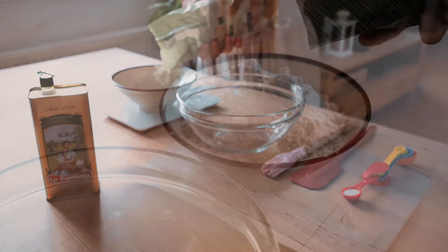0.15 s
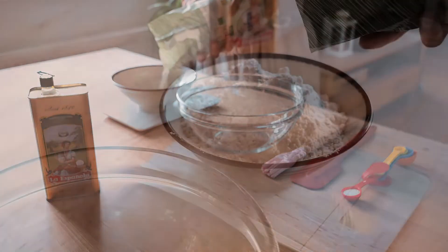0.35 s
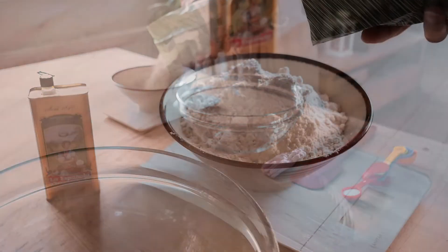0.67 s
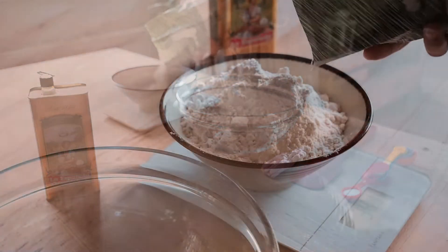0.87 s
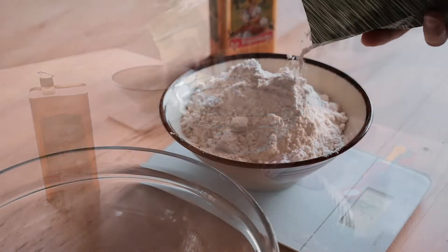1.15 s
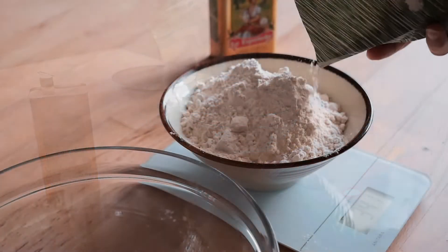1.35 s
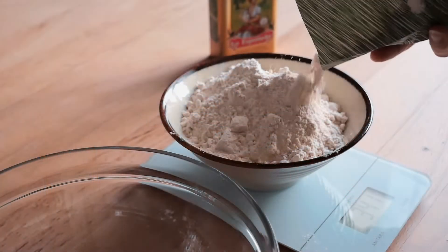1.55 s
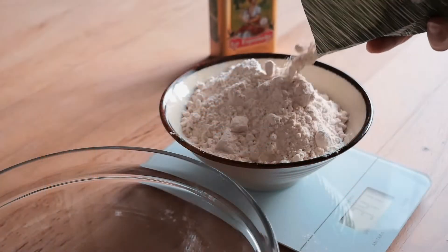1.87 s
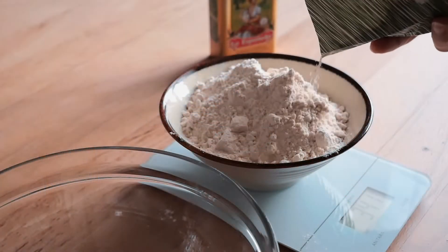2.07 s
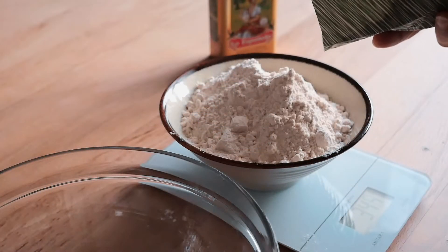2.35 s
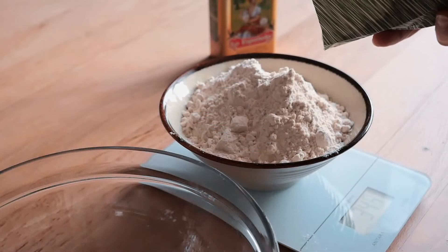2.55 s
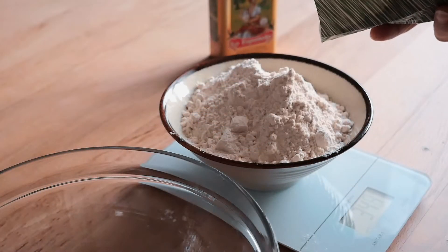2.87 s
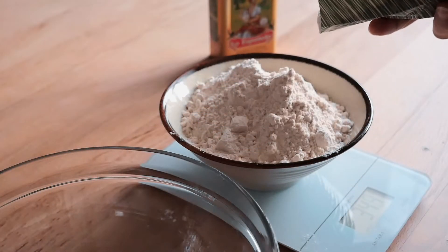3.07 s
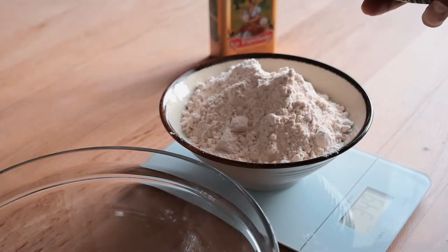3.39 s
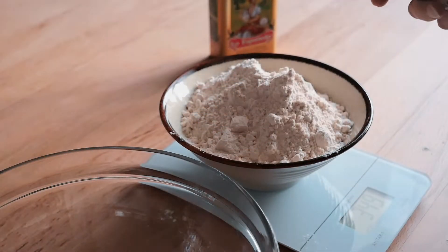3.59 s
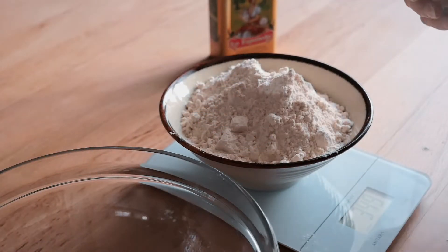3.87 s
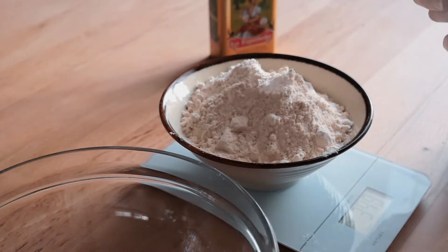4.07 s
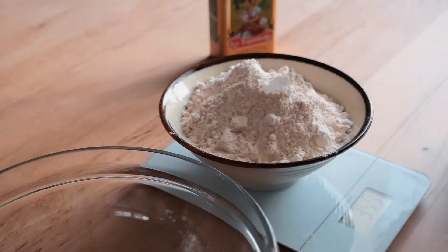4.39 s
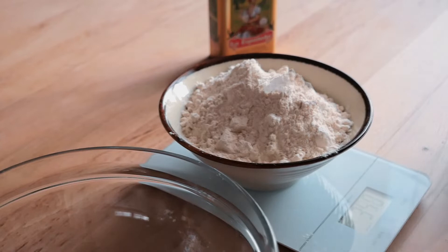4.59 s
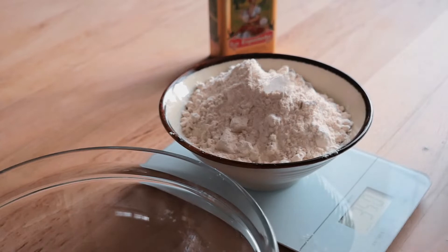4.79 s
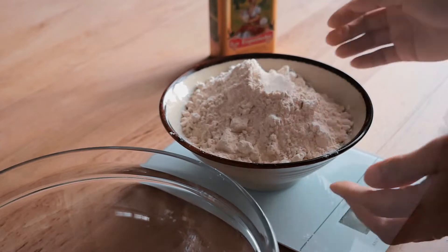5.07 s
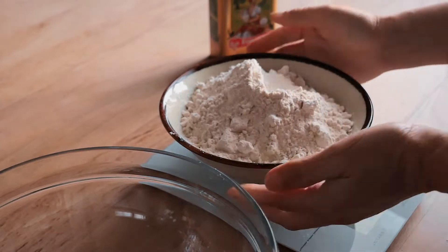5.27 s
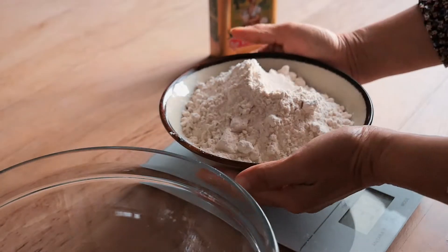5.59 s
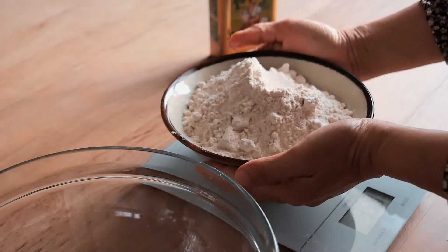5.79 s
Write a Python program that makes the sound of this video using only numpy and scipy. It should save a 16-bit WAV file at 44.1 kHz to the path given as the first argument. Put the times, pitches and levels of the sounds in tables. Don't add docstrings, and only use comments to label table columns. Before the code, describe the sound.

Close up in a lively kitchen, a hard double knock on wood opens, followed by soft, uneven paper rustles and a small click and rap as a flour bag is shaken. After a quiet pause with faint hum, the bag is lifted, glass sings for an instant, and the paper is crushed in loud crackling snaps. Faint settling rustles and a low bump end it.

```python
import sys
import numpy as np
from scipy import signal
from scipy.io import wavfile
from scipy.ndimage import uniform_filter1d

SR = 44100
rng = np.random.default_rng(int(sys.argv[2]) if len(sys.argv) > 2 else 0)


def materialize(psi):
    bounded = np.clip(np.atleast_2d(psi).T, -1, 1)
    quanta = np.round(bounded * 32767).astype(np.int16)
    wavfile.write(sys.argv[1], SR, quanta)


def gain_from_decibels(decibels):
    exponent = np.asarray(decibels, float) / 20
    return 10 ** exponent


N = 261954


def evened(x):
    return x / np.sqrt(np.mean(x ** 2) + 1e-20)


def peaked(x, db):
    return gain_from_decibels(db) * x / abs(x).max()


def add(mix, s, sound):
    part = mix[round(s * SR):][:len(sound)]
    part += sound[:len(part)]


def coloured(x, spectrum):
    f, db = np.transpose(spectrum)
    hz = abs(np.fft.fftfreq(8192, 1 / SR))
    gain_db = np.interp(np.log(hz + 1), np.log(f + 1), db, right=-90)
    log_gain = np.log(gain_from_decibels(gain_db))
    taps = np.fft.ifft(np.exp(np.conj(signal.hilbert(log_gain)))).real[:4096]
    return signal.oaconvolve(x, taps)[:len(x)]


def resonate(x, hz, width):
    b, a = signal.iirpeak(min(hz, 0.45 * SR), hz / max(width, 1), SR)
    return signal.lfilter(b, a, x)


# (frequency [Hz], t60 [s])
ROOM_DECAY = [(150, 0.29), (400, 0.32), (1040, 0.48), (2760, 0.42), (7280, 0.39)]
# (delay [s], level [dB])
EARLY_ECHOES = [(.0035, -15), (.0072, -10), (.0095, -14.5), (0.0136, -9.5), (0.019, -19.5)]


def room(x, tail_db):
    taps = np.zeros(SR)
    at = np.arange(200, SR - 20, 20)
    taps[at + rng.integers(0, 20, len(at))] = rng.choice([-1., 1.], len(at))
    hz, t, z = signal.stft(taps, SR, nperseg=256)
    t60 = np.interp(hz, *np.transpose(ROOM_DECAY))[:, None]
    tail = signal.istft(z * gain_from_decibels(-60 * t / t60), SR, nperseg=256)[1]
    tail /= np.linalg.norm(tail)
    for s, db in EARLY_ECHOES:
        tail[round(s * SR)] += gain_from_decibels(db)
    return x + gain_from_decibels(tail_db) * signal.fftconvolve(x, tail)[:N]


def crackle(per_s, spread_db, clump_db):
    size = gain_from_decibels(spread_db * np.minimum(rng.exponential(1, N), 5)) * rng.choice([-1., 1.], N)
    slow = uniform_filter1d(uniform_filter1d(rng.standard_normal(N), 300), 300)
    slips = rng.random(N) < per_s / SR
    return size * slips * gain_from_decibels(clump_db * evened(slow))


def strokes(rows, rise, fall):
    s, hold, db, bright_db, weight_db = np.transpose(rows)[:, :, None]
    t = np.arange(0, N + 64, 64) / SR
    shape_db = db - rise * np.maximum(s - t, 0) - fall * np.maximum(t - s - abs(hold), 0)
    shares_db = 0, 0.16 + 0.37 * bright_db, weight_db, bright_db
    powers = [(gain_from_decibels(shape_db + share) ** 2).sum(0) for share in shares_db]
    return np.array([np.repeat(power, 64)[:N] for power in powers])


# (time [s], hold [s], effort [dB], brightness [dB], weight on the table [dB])
SHAKES = [(0, .02, -67, -23, -12), (.03, .004, -49.5, -8, 4), (.25, 0.03, -51.5, -19, 0),
          (.375, 0.027, -58.5, -7.5, -1.5), (.5, 0.026, -56, -11, -4), (.56, 0.0033, -54.5, -12, -17),
          (.65, 0.0046, -63.5, -8, -1), (.68, .04, -58.5, -5, -0.5), (.802, 0.023, -55.5, -8.5, -4),
          (.86, 0.037, -58, -11, -6), (.978, 0.021, -58, -4.5, -18), (1.04, 0.088, -55, -8, -16.5),
          (1.3, .02, -64, -7, -11), (1.33, 0.0051, -50.5, -10, -9), (1.47, .03, -54, -5, -4),
          (1.584, 0.021, -50, -7.5, -13.5), (1.684, 0.0022, -46.5, -6, -26), (1.774, 0.027, -52.5, -5, -19),
          (1.86, .004, -59.5, -15, -19), (1.952, 0.0047, -63, -7, -15)]
LIFT = [(3.4, 0.012, -66, -9, -3), (3.478, 0.035, -50, -18, -12), (3.53, 0.051, -47.5, 0.5, -12),
        (3.6, .07, -47, 0.5, -14), (3.675, .004, -48.5, -4, -24)]
CRUSH = [(3.689, 0.076, -43.5, -9.5, -1), (3.75, 0.034, -39.5, -14, -8), (3.8, 0.014, -32, -19, -1.5),
         (3.835, 0.0043, -34.5, -14, 0.5), (3.848, 0.014, -28, -18.5, -0.3), (3.882, .015, -30.5, -13, -1),
         (3.937, 0.018, -30, -17, -2), (3.998, 0.046, -34.5, -4, -2.5), (4.05, 0.024, -35, -4.5, -12),
         (4.104, 0.011, -28, -5.5, -1.4), (4.15, 0.05, -38.5, -15, -11), (4.238, 0.013, -43, -13, -3),
         (4.29, .02, -52.5, -9, -9), (4.33, 0.0097, -43.5, -17, -11), (4.375, 0.015, -52, -10, 4),
         (4.41, .035, -59, -5, 3)]
SETTLE = [(4.5, 0.0091, -64.5, -26, 1.5), (4.63, .004, -62.5, -5.5, -21), (4.73, .003, -50, -14.5, -0.5),
          (4.772, .004, -54.5, -31, -8), (4.815, 0.0061, -63, -5.5, 2), (4.86, 0.046, -60.5, -9, 3),
          (4.95, .01, -63.5, -14, 7), (4.995, 0.079, -55, -10.5, -3.5), (5.2, 0.13, -71, -4.5, 2.5),
          (5.3, 0.017, -72.5, -9, 14.5), (5.372, .015, -53, -5, 10), (5.4, 0.02, -63.5, -6.5, 9),
          (5.55, 0.0036, -70, -6, -3)]
# (frequency [Hz], level [dB per Hz])
WALLS = [(380, -37.5), (650, -6), (765, -5.5), (844, -4), (1220, -2), (1420, -4.5), (2200, -12.5),
         (2600, -16.5), (3380, -38), (5720, -120)]
# (frequency [Hz], level [dB per Hz])
CREASES = [(1000, -26.5), (1700, -7), (2050, -11), (2380, -7), (2640, -4), (3310, -2.5), (3570, -3),
           (5140, -8.5), (6320, -3), (8070, -9), (13500, -13), (15100, -10.5), (16000, -34)]
# (frequency [Hz], level [dB per Hz])
THRUM = [(24, -58), (40, -24.5), (209, -7.5), (279, -9.5), (312, -8), (350, -2), (497, -4), (600, -6),
         (800, -9), (1040, -35.5), (1760, -120)]


def rustle():
    power = strokes(SHAKES, rise=210, fall=170) + strokes(LIFT, rise=150, fall=380)
    power = power + strokes(CRUSH, rise=650, fall=299) + strokes(SETTLE, rise=790, fall=225)
    walls = coloured(room(crackle(900, 2.5, 1.0), 0.), WALLS)
    creases = coloured(room(crackle(4000, 4.1, 4.04), -0.39), CREASES)
    low_pass = signal.butter(2, 8000, fs=SR, output="sos")
    hiss = signal.sosfiltfilt(low_pass, creases)
    fizz = creases - hiss
    thrum = coloured(room(crackle(700, 3.0, 0.91), 0.), THRUM)
    out = np.zeros(N)
    for layer, p in zip((walls, hiss, thrum, fizz), power):
        out += evened(layer) * np.sqrt(abs(uniform_filter1d(p, size=64)))
    return out


# (frequency [Hz], level [dB per Hz])
AIR_COLOUR = [(15, -36.5), (25, -12.5), (120, -10), (166, -15), (195, -8.5), (242, -13), (301, -13),
              (796, -15), (887, -14.5), (1020, -15.5), (2610, -26.5), (6210, -24.5), (12200, -29.5),
              (14800, -22.5), (16000, -40)]
# (frequency [Hz], width [Hz], level [dB])
HUM = [(240, 4.2, -74.5), (14680, 65, -93)]


def floor():
    t = np.arange(N) / SR
    air_db, hum_ends_s, hum_fade_s = -64.5, 3.65, 0.173
    air = gain_from_decibels(air_db) * evened(coloured(rng.standard_normal(N), AIR_COLOUR))
    hum = np.zeros(N)
    for hz, width, db in HUM:
        waver = 0.65 * evened(resonate(rng.standard_normal(N), hz, width))
        hum += gain_from_decibels(db) * (np.sin(2 * np.pi * hz * t) + waver)
    return air + hum * np.clip((hum_ends_s - t) / hum_fade_s, 0, 1)


# blows (time [s], peak [dB]), the object's
# colour (frequency [Hz], level [dB per Hz]), then the room level [dB]
THUD = ([(.0362, -9.5), (.0535, -20.5)], [(40, -56.5), (150, -22), (320, -8), (420, -6), (520, -5),
        (800, -16), (2000, -50.5), (16000, -91)], 0.45)
CLATTER = ([(.0372, -16), (.0392, -6), (.042, -10.5), (.045, -10.5), (.0467, -14), (.0548, -21)],
           [(53, -35), (90, -35.5), (457, -11.5), (915, -0.5), (1040, -10.5), (1270, 1), (1380, -16),
           (1910, -8.5), (2230, -17.5), (3430, -8), (4750, -19), (6300, -17.5), (13500, -37), (15000, -46),
           (16000, -53)], 1.4)
TICK = ([(3.7565, -17)], [(400, -28), (1000, -6), (2500, -1.5), (3200, -8.5), (6000, -35), (14000, -45.5)],
        -3.5)
CLICK = ([(.482, -19)], [(410, -42), (700, -14), (2060, 4), (3950, 7), (5270, 2.5), (6820, -22),
         (9000, -42), (11700, -64), (19800, -120)], -5.5)
RAP = ([(1.3405, -11.5), (1.345, -20), (1.352, -21.5), (1.3805, -16), (1.395, -29)], [(76, -59), (130, -59),
       (247, -12.5), (283, -20.5), (405, -13.5), (454, -18.5), (499, -11), (662, -12.5), (756, -9.5),
       (914, -3.5), (1260, -14), (1580, -14.5), (3070, -27.5), (6670, -45.5), (12000, -55), (15600, -90),
       (22000, -120)], 0.98)
BUMP = ([(5.3702, -30.5), (5.3743, -31), (5.383, -51), (5.41, -54)], [(59, -58), (100, -27), (218, -1),
        (318, 7), (374, -12), (553, 4), (624, 4.5), (744, -5.5), (1080, -18), (1260, -35), (2500, -25.5),
        (3250, -62), (5500, -120)], 0.33)
KNOCKS = THUD, CLATTER, TICK, CLICK, RAP, BUMP


def knock(blows, colour, tail_db):
    out, t = np.zeros(N), np.arange(2000) / SR
    rattle_gain = 0.14 * gain_from_decibels(min(tail_db, 0))
    for s, db in blows:
        rattle = rattle_gain * rng.standard_normal(2000) * np.exp(-t / 0.0021)
        push = (t == 0) + rattle
        add(out, s, peaked(coloured(push, colour), db))
    return room(out, tail_db)


# (frequency [Hz], width [Hz], level [dB])
GLASS = [(4730, 30, 3), (5950, 40, -8), (7230, 25, 2), (7480, 25, 2), (7900, 30, -5), (8970, 30, -8),
         (10460, 25, -3), (12150, 25, -2), (13300, 30, -11)]
# (frequency [Hz], width [Hz], level [dB])
DISH = [(487, 23, -7), (1068, 21, -2.5), (1200, 24, -0.5)]


def drag():
    t = np.arange(N) / SR
    s = np.cumsum([3.675, 0.022, 0.115, 0.04])  # start, then grip, slide and release [s]
    edge_db = -34.5 * np.array([1, 0, 0, 1])
    glass_db = -47 + edge_db
    dish_db = -42 + edge_db + 9.5 * np.array([0, 0, 1, 1])
    rub = crackle(3000, 2., 1.)
    glass, dish = np.zeros(N), np.zeros(N)
    for hz, width, db in GLASS:
        waver = 0.3 * evened(resonate(rng.standard_normal(N), hz, width))
        glass += gain_from_decibels(db) * (np.sin(2 * np.pi * hz * t) + waver)
    for hz, width, db in DISH:
        dish += gain_from_decibels(db) * evened(resonate(rub, hz, width))
    glass = evened(glass) * gain_from_decibels(np.interp(t, s, glass_db))
    dish = evened(dish) * gain_from_decibels(np.interp(t, s, dish_db))
    touching = (t > s[0]) & (t < s[-1])
    return touching * (glass + dish)


# (time [s], wall ring [Hz], ring peak [dB], crack centre [Hz], crack peak [dB])
SNAPS = [(3.688, 477, -25.5, 7470, -40), (3.792, 1180, -33.5, 4710, -50), (3.815, 2010, -13, 3260, -7.5),
         (3.846, 2283, -17, 6820, -19), (3.845, 1090, -9.5, 6370, -8), (3.849, 1088, -11, 4010, -12),
         (3.854, 1276, -11, 4980, -28.5), (3.86, 1330, -14.5, 6300, -21.5), (3.878, 859, -12, 6300, -13.5),
         (3.88, 1670, -12.5, 5400, -10), (3.886, 1352, -34.5, 4650, -36.5),
         (3.936, 915, -31.5, 3140, -52.5), (3.993, 2800, -15, 9800, -8.5), (3.997, 2326, -14, 6400, -12),
         (4.005, 1710, -16, 6490, -36.5), (4.045, 2020, -18, 3350, -31), (4.106, 1830, -18, 3400, -17),
         (4.118, 710, -14, 3990, -22), (4.127, 1110, -35.5, 4270, -39.5), (4.325, 953, -35, 6200, -28.5),
         (4.683, 1200, -45, 3890, -62.5), (4.724, 1140, -41, 3960, -29), (4.734, 1370, -39, 3690, -37.5),
         (5.034, 660, -52.5, 6400, -57)]


def snaps():
    out, t = np.zeros(N), np.arange(600) / SR
    for s, ring_hz, ring_db, crack_hz, crack_db in SNAPS:
        splinters = rng.standard_normal(600) * np.exp(-t / 0.00086)
        burst = (t == 0) + splinters
        crack = coloured(burst + resonate(burst, crack_hz, 3000), CREASES)
        swell = 1 - np.exp(-t / 0.000067)
        ring = np.sin(2 * np.pi * ring_hz * t) * np.exp(-t / 0.0016) * swell
        add(out, s, peaked(np.diff(ring, prepend=0), ring_db) + peaked(crack, crack_db))
    return room(out, -5.5)


# (frequency [Hz], level [dB per Hz])
WIDE_AIR = [(18, -44), (30, -4.5), (194, -15), (233, -9), (569, -6.5), (1070, -1.5), (1250, -7),
            (2290, -14), (5740, -18), (6720, -11.5), (8980, -18), (14800, -16.5), (16000, -29)]


def wide_air():
    t = np.arange(N) / SR
    opens_s, shut_s, shut_length_s = 4.36, 5.385, 0.055
    slope = np.where(t < opens_s, 140, 1.5)
    level = gain_from_decibels(-67.5 + (t - opens_s) * slope)
    dip = np.minimum(abs(t - shut_s) / shut_length_s, 1) ** 2
    return evened(coloured(rng.standard_normal(N), WIDE_AIR)) * level * dip


def scene():
    paper = rustle() + snaps()
    knocks = sum(knock(*k) for k in KNOCKS)
    mono = paper + knocks + drag() + floor()
    wide = wide_air()
    return np.array([mono + wide, mono - wide])


# (from [s], to [s])
LOCKED = [(0, .22), (.47, .58), (1.32, 1.57), (2.78, 2.88), (3.69, 3.72)]


def faint_width(mono):
    hz, t, z = signal.stft(mono, SR, nperseg=1024)
    chosen = rng.random((33, len(t) // 2 + 1)) < 0.45
    patches = np.kron(chosen, np.ones((16, 2)))[:len(hz), :len(t)]
    z = z * patches * np.exp(2j * np.pi * rng.random(z.shape))
    s = np.arange(N) / SR
    fades_s, ends_s, fade_db_per_s = 3.55, 4.5, 63
    free = (s < ends_s) * np.prod([(s < a) | (s > b) for a, b in LOCKED], axis=0)
    width = gain_from_decibels(-14 - fade_db_per_s * np.maximum(s - fades_s, 0))
    width = width * uniform_filter1d(1. * free, size=200)
    return signal.istft(z, SR, nperseg=1024)[1][:N] * width


def top_cut(x):
    return signal.sosfilt(signal.butter(12, 16670, fs=SR, output="sos"), x)


def record(dry):
    side = faint_width(dry.mean(0))
    mix = dry + np.array([side, -side])
    return top_cut(mix)


dry = scene()
out = record(dry)
materialize(out)
```